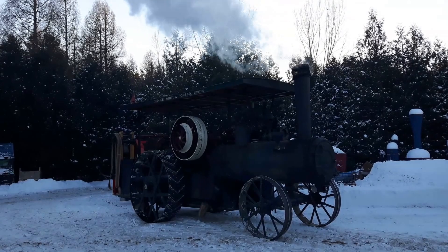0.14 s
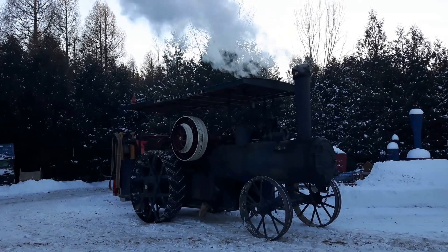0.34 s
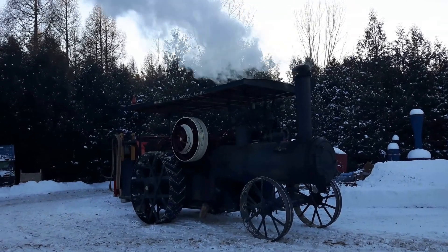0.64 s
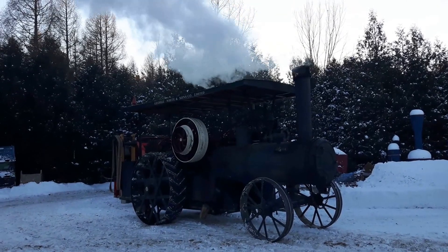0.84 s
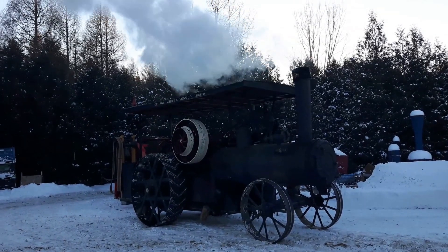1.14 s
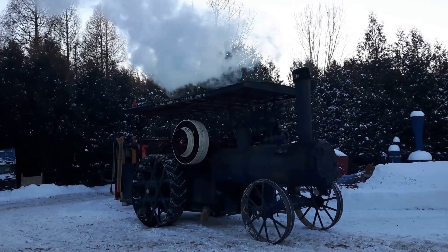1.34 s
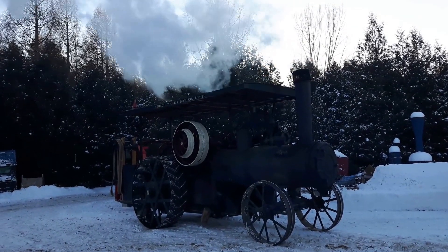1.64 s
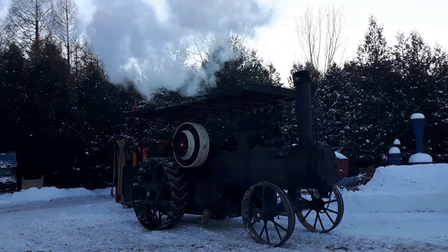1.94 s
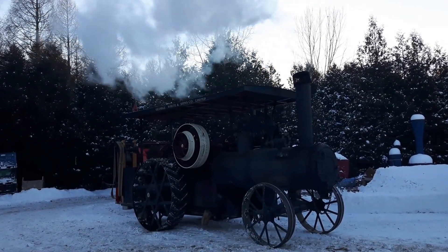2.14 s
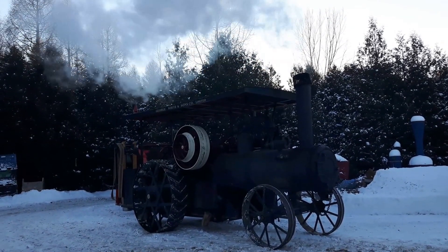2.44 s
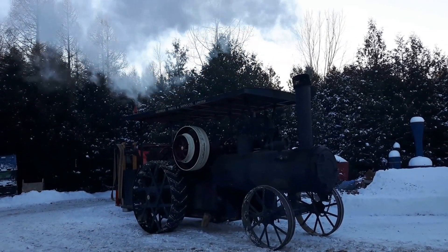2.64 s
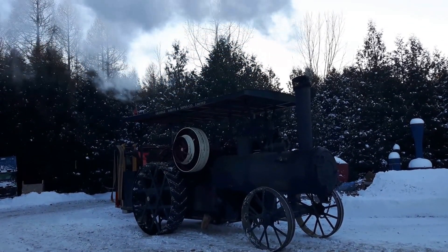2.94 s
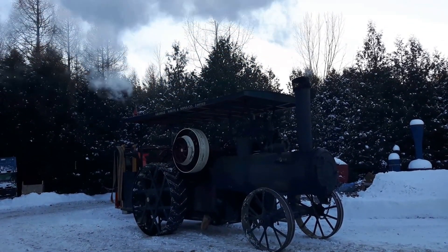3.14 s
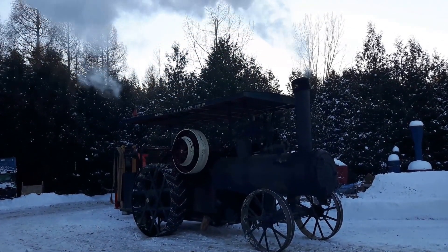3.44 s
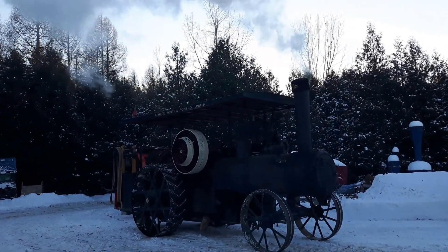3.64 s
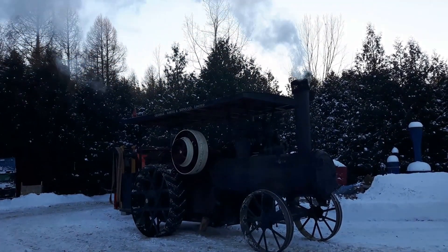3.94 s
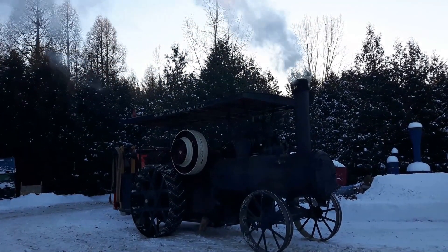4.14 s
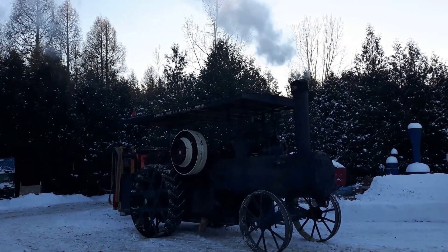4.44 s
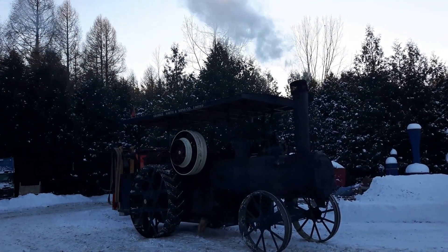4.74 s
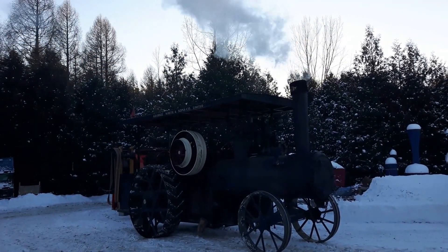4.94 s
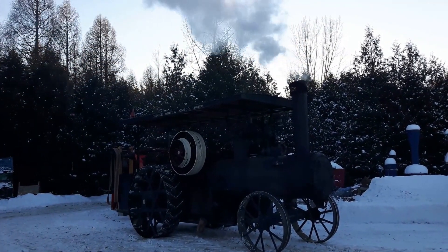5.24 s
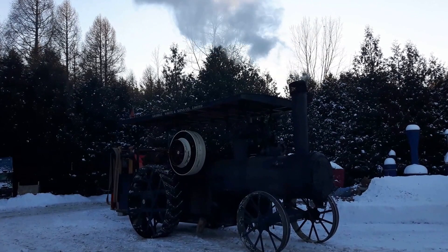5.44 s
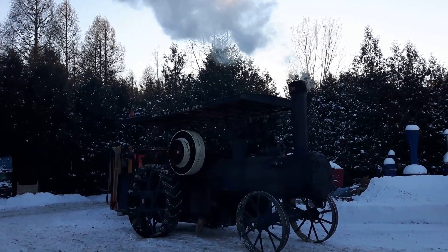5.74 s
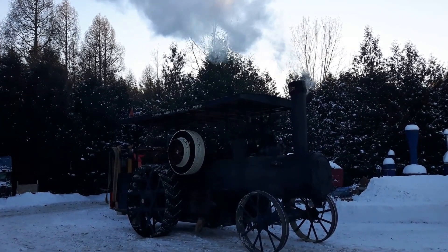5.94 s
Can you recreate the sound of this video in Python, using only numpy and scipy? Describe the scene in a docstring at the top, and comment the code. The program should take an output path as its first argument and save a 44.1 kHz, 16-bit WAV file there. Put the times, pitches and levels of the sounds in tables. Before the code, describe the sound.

A steam traction engine idles in an open snowy yard, a low droning purr of about twenty-five soft pulses a second, hunting slightly in speed. Soft metallic clatter and a thin steam hiss run beneath. A dull pop comes before the middle; late on, a latch clicks and a door slams with a short rattle and faint outdoor tail. The drone continues. Single fixed microphone, mono.

```python
"""A low drone throbs about 25 times a second and hunts in speed: a steam traction engine idles in a snowy yard.
Each exhaust pulse is a sum of multiples of the throb, growl before buzz, chest, boom and bass, and a noise puff.
Coloured noise and narrow noise bands make the soft clatter, the leaking steam and the rumbling air.
Damped sines make dull pops and bumps; struck modes and short noise make the one door: latch, slam and rattle.
Brief squeaks are swelling sines, and small ticks are decaying bursts of filtered noise."""
import sys
import numpy as np
from scipy import signal
from scipy.fft import rfft, irfft
from scipy.io import wavfile
from scipy.ndimage import map_coordinates

SR = 44100
rng = np.random.default_rng(int(sys.argv[2]) if len(sys.argv) > 2 else 0)


def digitize_waveform(pressure):
    """Quantize a signal to 16-bit integers and store it at the path in sys.argv[1].

    Rows of a 2-D input are taken as channels; values are limited to [-1, 1].
    """
    field = np.atleast_2d(pressure).T
    bounded = np.clip(field, -1, 1)
    quanta = np.round(bounded * 32767).astype(np.int16)
    wavfile.write(sys.argv[1], SR, quanta)


N = 269010
T = np.arange(N) / SR
FREQS = np.maximum(np.fft.rfftfreq(N, 1 / SR), 1)

# Speed of the throb. Each row: time in seconds, pulses per second in Hz.
THROB_SPEED = [(0.0, 25.2), (0.14, 23.72), (0.46, 25.65), (0.76, 24.8), (1.2, 24.8), (1.42, 25.6),
               (1.55, 25.5), (1.68, 26.0), (1.83, 25.4), (2.0, 25.31), (2.32, 26.65), (2.58, 24.74),
               (2.72, 26.13), (2.94, 26.2), (3.2, 24.74), (3.84, 23.89), (3.99, 22.85), (4.14, 23.85),
               (4.25, 23.35), (4.34, 24.2), (4.42, 23.6), (4.53, 24.9), (4.7, 25.15), (4.85, 25.0),
               (4.98, 25.4), (5.14, 24.37), (5.64, 26.53), (6.08, 24.82)]
# Harmonics in each register: bass, boom, low chest, high chest, low growl, high growl, buzz.
# Each entry maps a multiple of the throb to its level in dB relative to the register.
REGISTER_HARMONICS = [{4: 0}, {5: 0}, {6: .5}, {7: .8, 8: -8.5}, {9: 1}, {10: 1}, {12: -7.5, 13: .8, 14:
                      -4}]
# Delay of each register within a cycle at the idle speed, in seconds, in the same order:
# the growl arrives first, then the buzz, the chest, the boom and the bass.
REGISTER_DELAYS = [.036, .035, .033, .033, .021, .021, .026]
# Level of each register. Each row: time in seconds, level in dB.
BASS_LEVEL = [(0.0, -47.0), (1.34, -41.0), (2.28, -50.5), (2.58, -43.5), (4.44, -43.5), (4.62, -57.5),
              (5.08, -51.0), (5.48, -54.5), (5.76, -50.0), (6.09, -49.5)]
BOOM_LEVEL = [(0.0, -32.0), (1.0, -42.5), (1.18, -40.0), (1.36, -46.5), (1.46, -60.5), (1.5, -47.0),
              (1.7, -36.0), (2.08, -46.5), (2.24, -33.0), (2.44, -35.0), (2.6, -43.5), (2.82, -34.5),
              (3.3, -40.5), (3.92, -45.0), (4.22, -37.5), (4.54, -41.5), (4.82, -34.5), (6.09, -30.5)]
LOW_CHEST_LEVEL = [(0.0, -49.5), (0.84, -46.0), (2.04, -49.0), (2.34, -55.0), (2.5, -46.5), (2.64, -55.0),
                   (2.86, -52.0), (3.14, -46.0), (4.06, -41.5), (4.2, -42.5), (4.78, -49.0), (6.09, -43.5)]
HIGH_CHEST_LEVEL = [(0.0, -53.5), (0.38, -44.0), (1.24, -50.0), (1.58, -43.5), (3.02, -41.5), (3.18, -45.5),
                    (3.92, -49.0), (4.34, -44.5), (6.0, -48.0), (6.09, -56.5)]
LOW_GROWL_LEVEL = [(0.0, -46.5), (1.12, -46.5), (2.16, -51.5), (2.34, -48.5), (2.68, -57.0), (2.9, -52.0),
                   (3.28, -51.5), (4.1, -56.0), (4.32, -46.5), (5.6, -45.0), (6.09, -51.5)]
HIGH_GROWL_LEVEL = [(0.0, -47.0), (1.16, -47.5), (1.48, -57.5), (1.7, -55.5), (2.02, -57.5), (2.14, -46.0),
                    (3.74, -43.5), (4.3, -50.5), (4.62, -43.5), (5.28, -44.5), (5.42, -57.5), (6.09, -51.0)]
BUZZ_LEVEL = [(0.0, -51.5), (0.56, -56.5), (1.6, -57.5), (1.7, -54.0), (2.02, -59.0), (2.14, -46.0),
              (2.56, -57.5), (2.7, -49.0), (2.92, -46.0), (3.14, -58.0), (4.64, -57.5), (5.3, -55.0),
              (5.5, -46.5), (6.09, -54.5)]
# Faint harmonics of constant mean level: each entry maps a multiple of the throb to its level in dB.
FAINT_HARMONICS = {2: -63, 3: -64, 11: -53.5, 15: -59.5, 16: -63}
# Spectra of noise. Each row: frequency in Hz, relative level in dB.
PUFF_SPECTRUM = [(50, -37), (90, -18), (130, 3.5), (190, -2.5), (260, -4), (350, -4), (450, -26),
                 (700, -56)]
GEAR_SPECTRUM = [(200, -2.5), (420, 1.5), (560, -1), (800, -6), (1050, -7), (1200, -11), (1850, -15),
                 (2060, -14), (2300, -19.5), (2550, -23.5), (2950, -23.5), (3800, -33), (5200, -42.5),
                 (9000, -74)]
STEAM_SPECTRUM = [(2500, 2.5), (4300, 4.5), (5000, 2), (5500, 9.5), (6400, 6.5), (7200, 9.5), (9200, 10),
                  (9700, -2), (11300, -35.5), (13000, -10.5), (15700, -23)]
CRACK_SPECTRUM = [(200, -3), (500, 7.5), (1000, 6), (1500, 1), (2000, 1.5), (2600, -6), (3400, -12),
                  (4600, -23), (5400, -34), (14000, -44)]
RUMBLE_SPECTRUM = [(15, -41.5), (30, -20.5), (45, -6), (60, 4), (85, 5.5), (130, 6.5), (260, -45.5)]
# Ringing metal of the running gear. Each row: frequency in Hz, nominal width in Hz, level in dB relative
# to the clatter, middle of its swell in seconds, half length in seconds, swell in dB.
GEAR_RESONANCES = [(560, 40, -21, 1.2, .5, 3), (715, 40, -22, 2.1, .5, 6), (945, 40, -21, 4.9, 1, 3),
                   (1065, 55, -19, 5.3, .8, 4), (2065, 45, -25.5, 5, 1.5, 3.5)]
# Squeaks of a dry bearing. Each row: middle in seconds, half length in seconds, mean pitch in Hz, peak in dB.
BEARING_SQUEAKS = [(1.075, 0.1, 560, -55.5), (1.218, 0.059, 559, -49), (4.244, 0.17, 567, -54)]
# The steam leak. Each row: time in seconds, then relative levels in dB of the hiss (which also carries
# the narrow jet tones), the lower whistle and the upper whistle.
LEAK_LEVELS = [(0, -82, -87, -85), (1.5, -82.5, -85, -87), (2.6, -82.5, -86, -86), (3.4, -81.5, -83, -82),
               (4.5, -82, -84, -83), (5.1, -80.5, -81, -81), (6.1, -79, -81, -80.5)]
# Narrow jet tones. Each row: frequency in Hz, nominal width in Hz, level in dB relative to the leak,
# middle of its swell in seconds, half length in seconds, swell in dB.
JET_RESONANCES = [(3030, 130, -13, 1.1, 1.7, 14), (4480, 110, -15, 5.1, 1.1, 8),
                  (6820, 220, -13, 1.2, 1.8, 6), (8880, 280, -10, 1.3, 1.5, 11),
                  (10100, 250, -16, 4.6, 2, 2), (12860, 160, -22, 4.5, 1.6, 7),
                  (13500, 150, -15, .15, .25, 7), (13570, 160, -22, 1.2, .22, 16),
                  (13500, 140, -24, 3.55, .2, 14)]
# Broad whistles of the leak, lower and upper. Each row: frequency in Hz, nominal width in Hz.
BROAD_WHISTLES = [(7720, 190), (8800, 650)]
# Latch clicks just before the slam. Each row: start in seconds, level in dB.
LATCH_TIMES = [(4.7203, -40.5), (4.7238, -41.5)]
# Modes of the latch and of the door. Each row: frequency in Hz, relative level in dB, 60 dB decay in seconds.
LATCH_MODES = [(700, 0, .045), (810, -2, .03), (1050, -8, .07), (1400, -2, .04), (1550, -8, .035),
               (2105, -10, .1), (2300, -16, .04), (2885, -13, .04), (3180, -14, .035), (4400, -23, .03)]
DOOR_MODES = [(511, -8, .25), (680, 0, .1), (770, 3, .08), (950, 1, .16), (1330, -8, .07), (1470, -5, .12),
              (1712, -5.5, .09), (1920, -3, .06), (2290, -8, .045), (2650, -10, .05), (3000, -12, .05)]
# Blows of the door. Each row: start in seconds, relative level in dB, nominal low cut in Hz,
# nominal high cut in Hz, 60 dB decay of the contact in seconds, snap as a share of the contact.
DOOR_BLOWS = [(4.7525, -30.5, 1800, 2000, .04, .3), (4.7614, -31.5, 250, 1200, .035, 1.1),
              (4.7665, -35, 200, 1100, .13, .3), (4.797, -44.5, 500, 1700, .07, .3),
              (4.8322, -37, 1100, 1400, .025, 1), (4.8962, -38.5, 1300, 3000, .018, .6)]
# Dull pops, the thud of the door and bumps of air. Each row: start in seconds, level in dB before decay
# and softening, frequency in Hz, 60 dB decay in seconds.
DAMPED_SWINGS = [(.835, -43, 52, .09), (1.225, -42, 48, .14), (2.075, -39, 56, .09),
                 (2.578, -32, 740, .009), (2.5828, -32.5, 600, .012), (2.6052, -21.5, 430, .011),
                 (2.606, -35.5, 68, .1), (3.53, -40, 58, .09), (4.764, -26.5, 95, .17),
                 (4.772, -34, 52, .2), (4.8065, -27, 105, .1)]
# Ticks and spits. Each row: start in seconds, relative level in dB, frequency in Hz, nominal width in Hz.
TICK_BURSTS = [(0.361, -68.5, 4200, 1000), (1.003, -70, 4363, 1000), (1.874, -45, 744, 300),
               (2.217, -64, 3600, 1900), (2.218, -68, 7300, 1750), (2.321, -47, 690, 160),
               (3.33, -44, 450, 100), (3.49, -72, 14030, 1990), (3.635, -75, 13350, 1984),
               (3.846, -67, 14550, 1808), (4.19, -64, 2840, 1789), (5.118, -52, 1110, 600),
               (5.866, -72, 14280, 1600)]

IDLE_HZ = 25  # nominal speed that turns delays into phase
FAINT_DELAY_S = .024
# the boom sinks into a null and returns slightly earlier in the cycle, which evens out the throb
BOOM_NULL_S, BOOM_TURN_S, BOOM_LEAD_S = 1.46, .06, .0027
CLATTER_DB, CLATTER_RISE_DB_PER_S, CLATTER_WAVER_DB = -52.5, 0.4, 0.28
RUMBLE_DB, GUST_DB, GUST_POINTS_PER_S = -53, 3, 8.6
TOP_HZ = 15700


def drone(speed_hz, puff_db=-49.0, puff_rise_db_per_s=.5):
    """Harmonic synthesis: phase-locked multiples of the exhaust rate, delayed by register, add up to pulses."""
    turn = 2 * np.pi * np.cumsum(speed_hz) / SR + .007 * walk(25)
    out = sum(undb(db) * multiple(turn, k, FAINT_DELAY_S, -12.5) for k, db in FAINT_HARMONICS.items())
    levels = (BASS_LEVEL, BOOM_LEVEL, LOW_CHEST_LEVEL, HIGH_CHEST_LEVEL,
              LOW_GROWL_LEVEL, HIGH_GROWL_LEVEL, BUZZ_LEVEL)
    for harmonics, level, delay_s in zip(REGISTER_HARMONICS, levels, REGISTER_DELAYS):
        if level is BOOM_LEVEL:
            returned = (1 + np.tanh((T - BOOM_NULL_S) / BOOM_TURN_S)) / 2
            delay_s = delay_s - BOOM_LEAD_S * returned
        register = sum(undb(db) * multiple(turn, k, delay_s, db) for k, db in harmonics.items())
        out = out + undb(curves(level)[0]) * register
    # each pulse also carries a puff of turbulence
    puff = np.exp(.3 * np.cos(turn - 2 * np.pi * IDLE_HZ * np.mean(REGISTER_DELAYS)))
    puff_level = undb(puff_db + puff_rise_db_per_s * T)
    return out + puff_level * puff * colour(noise(), PUFF_SPECTRUM)


def multiple(turn, k, delay_s, weak_db):
    """Phase and amplitude modulation: one harmonic, rms near one, wavering more the weaker it is."""
    slip = (.07 - .025 * weak_db) * walk(5) + .17 * walk(1.1)
    waver_db = (.6 - .15 * weak_db) * walk(7)
    phase = k * (turn - 2 * np.pi * IDLE_HZ * delay_s) + slip
    return -np.sqrt(2) * undb(waver_db) * np.cos(phase)


def gear(grain_db=0.5, flicker_db=0.91, ring_waver_db=1.5):
    """Dense contact noise: many small uneven contacts of rods and bearings blur, and metal parts resonate."""
    contacts = noise() * undb(grain_db * walk(150) + flicker_db * walk(25))
    rings = sing(GEAR_RESONANCES, ring_waver_db, drift_hz=10)
    level_db = CLATTER_DB + CLATTER_RISE_DB_PER_S * T + CLATTER_WAVER_DB * walk(17)
    return undb(level_db) * (colour(contacts, GEAR_SPECTRUM) + rings)


def squeaks(waver=0.0234):
    """Frequency modulation: a bearing sings briefly as a swelling sine of wavering pitch."""
    out = 0
    for middle_s, half_s, hz, db in BEARING_SQUEAKS:
        swell = np.cos(np.pi / 2 * np.clip((T - middle_s) / half_s, -1, 1)) ** 2
        phase = 2 * np.pi * np.cumsum(hz * (1 + waver * walk(80))) / SR
        out = out + undb(db) * swell * np.sin(phase)
    return out


def steam(hiss_db=4.0, jet_db=0, whistle_db=-3):
    """Turbulence noise: a thin leak hisses, with narrow jet tones and two whistles that trade strength."""
    level_db, *whistle_levels = curves(LEAK_LEVELS)
    jet = sing(JET_RESONANCES, waver_db=1.5, drift_hz=25)
    whistles = 0
    for (hz, width), db in zip(BROAD_WHISTLES, whistle_levels):
        whistles = whistles + undb(db + 1.5 * walk(4)) * band(hz, width)
    hiss = undb(hiss_db) * colour(noise(), STEAM_SPECTRUM)
    return undb(level_db) * (hiss + undb(jet_db) * jet) + undb(whistle_db) * whistles


def sing(table, waver_db, drift_hz):
    """Filtered noise, frequency-shifted: narrow bands wander in pitch, flicker, and each swell once."""
    out = 0
    for hz, width, db, middle_s, half_s, swell_db in table:
        wander = np.exp(2j * np.pi * np.cumsum(drift_hz * walk(5)) / SR)
        swell = np.exp(-((T - middle_s) / half_s) ** 2)
        level_db = db + swell_db * swell + waver_db * walk(5.3)
        out = out + undb(level_db) * np.real(signal.hilbert(band(hz, width)) * wander)
    return out


def latch(scrape_db=-5.5, scrape_t60=.04):
    """Impact excitation: two quick metal clicks ring the latch modes, each with a short scrape."""
    out = 0
    for s, db in LATCH_TIMES:
        scrape = fade(s, scrape_t60) * colour(noise(), CRACK_SPECTRUM)
        out = out + undb(db) * (strike(LATCH_MODES, s) + undb(scrape_db) * scrape)
    return out


def door(ring_db=-12, crack_db=-7, rattle_db=3, echo_db=-49, echo_t60=.85):
    """Impact and reverberation: blows snap, rattle and ring the panel; the trees throw back a faint tail."""
    blows = 0
    for s, db, low_hz, bright_hz, t60, snap in DOOR_BLOWS:
        contact = fade(s, t60) * unit(noise() * undb(rattle_db * walk(160)))
        first_contact = np.arange(N) == int(s * SR)
        contact = contact + snap * np.linalg.norm(contact) * first_contact
        crack = colour(contact, CRACK_SPECTRUM) * contact.std()
        blow = undb(db) * (undb(crack_db) * crack + undb(ring_db) * strike(DOOR_MODES, s))
        # each blow has its own low and high cut
        cut = ((1 + .5j * FREQS / bright_hz) * (1 - .5j * low_hz / FREQS)) ** 2
        blows = blows + irfft(rfft(blow) / cut, N)
    # the tail starts with the first, thin scraping blow, whose table level is the highest
    echo_start_s = max(DOOR_BLOWS, key=lambda row: row[1])[0]
    echo = colour(noise() * undb(rattle_db * walk(90)), CRACK_SPECTRUM) * fade(echo_start_s, echo_t60)
    return blows + undb(echo_db) * echo


def strike(modes, s):
    """Modal synthesis: a body struck at s rings as a sum of decaying sines of random sign."""
    age = T[:SR // 2]
    ring = 0
    for hz, db, t60 in modes:
        ring = ring + rng.choice([-1, 1]) * undb(db - 60 * age / t60) * np.sin(2 * np.pi * hz * age)
    return np.pad(ring, (int(s * SR), N))[:N]


def thuds():
    """Heavily damped oscillation: pops, bumps and door thud are short swings softened by a low-pass."""
    swings = 0
    for s, db, hz, t60 in DAMPED_SWINGS:
        swings = swings - undb(db) * fade(s, t60) * np.sin(2 * np.pi * hz * (T - s))
    return irfft(rfft(swings) / (1 + 1j * FREQS / 1700) ** 2, N)


def ticks(t60=0.045):
    """Resonant filtering: drips and loose metal give decaying noise bursts, each in its own resonance."""
    out = 0
    for s, db, hz, width in TICK_BURSTS:
        burst = fade(s, t60) * noise()
        tick = unit(irfft(rfft(burst) * resonance(FREQS, hz, 1.3 * width) ** 2, N))
        out = out + undb(db) * burst.std() * tick
    return out


def rumble():
    """Low-frequency noise, amplitude-modulated: air stirs in the bass in small quick gusts."""
    return undb(RUMBLE_DB + GUST_DB * walk(GUST_POINTS_PER_S)) * colour(noise(), RUMBLE_SPECTRUM)


def undb(db):
    """Logarithmic level: decibels become an amplitude gain."""
    return 10 ** (np.asarray(db) / 20)


def unit(x):
    """Normalisation: scale to an rms of one."""
    return x / np.sqrt(np.mean(np.abs(x) ** 2))


def curves(table):
    """Linear interpolation: the columns after time become curves over the scene."""
    s, *columns = np.transpose(table)
    return [np.interp(T, s, c) for c in columns]


def walk(rate):
    """Smooth random fluctuation: a spline through `rate` random points per second, spread near one."""
    points, coarse = rng.standard_normal(1024), T[::32]
    return np.interp(T, coarse, map_coordinates(points, [coarse * rate], order=2, mode="mirror"))


def noise():
    """White noise: equal mean power at every frequency."""
    return rng.standard_normal(N)


def colour(x, points):
    """Spectral shaping: weight a sound by (Hz, dB) points on a log-frequency axis, rms one."""
    hz, db = np.transpose(points)
    gain = undb(np.interp(np.log(FREQS), np.log(hz), db))
    return unit(irfft(rfft(x) * gain, N))


def resonance(f, hz, width):
    """Damped resonator: complex response, one at its centre."""
    return 1 / (1 + 1j * (f * f - hz * hz) / (f * width))


def band(hz, width):
    """Cascaded resonance: noise through two equal resonators, rms one."""
    return unit(irfft(rfft(noise()) * resonance(FREQS, hz, 1.34 * width) ** 2, N))


def fade(s, t60):
    """Exponential decay: a sudden start at s, falling 60 dB in t60 seconds."""
    return (T >= s) * np.exp(-np.log(1000) * np.clip((T - s) / t60, 0, 10))


def scene():
    """Superposition: all sources add at one spot in the open air."""
    engine = drone(curves(THROB_SPEED)[0]) + gear() + squeaks() + steam() + ticks()
    return (engine + latch() + door() + thuds() + rumble())[None]


def record(dry):
    """Band limiting: a steep elliptic low-pass cuts the microphone's top."""
    return signal.sosfilt(signal.ellip(10, .1, 70, TOP_HZ, fs=SR, output="sos"), dry)


dry = scene()
out = record(dry)
digitize_waveform(out)
```